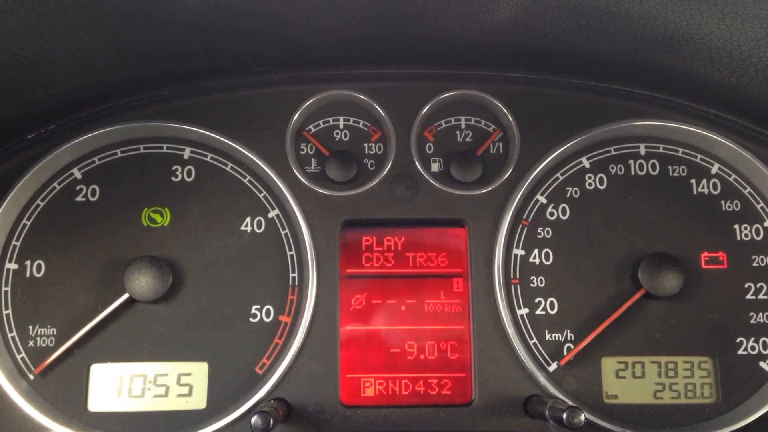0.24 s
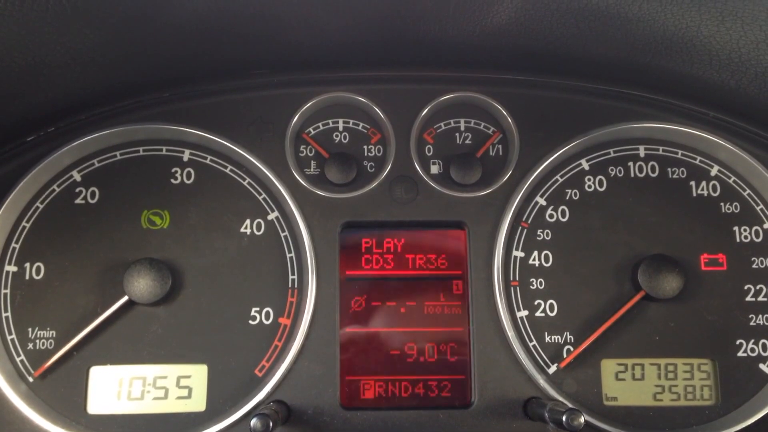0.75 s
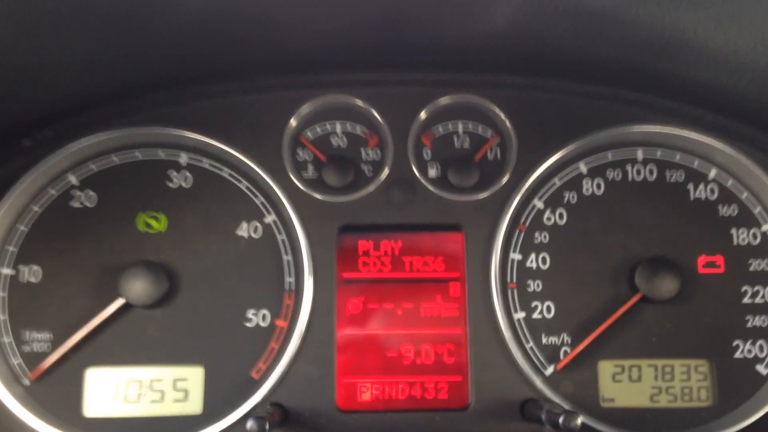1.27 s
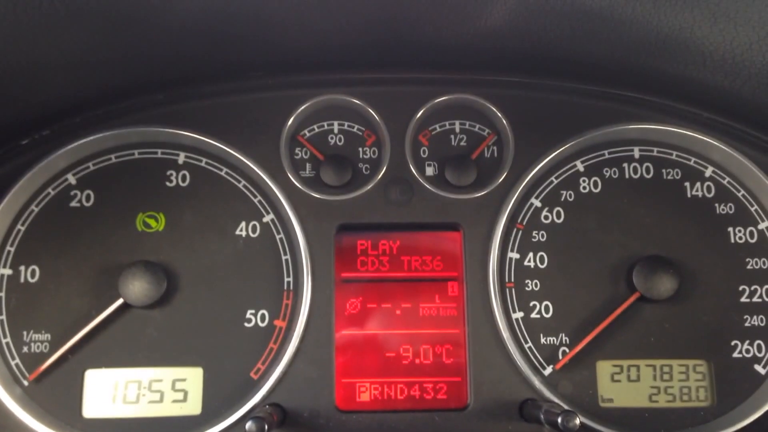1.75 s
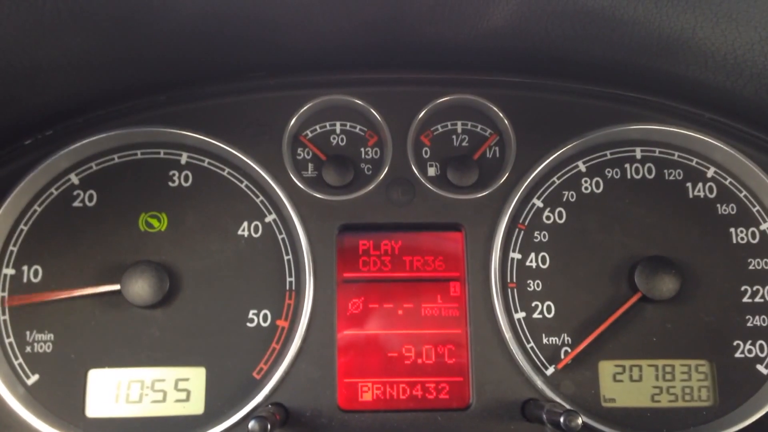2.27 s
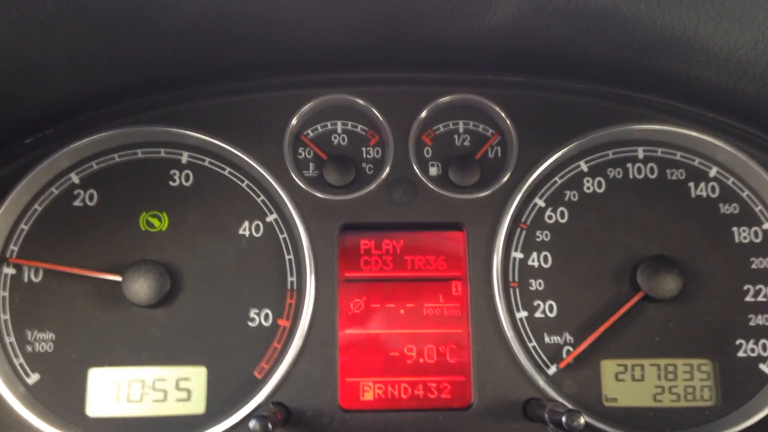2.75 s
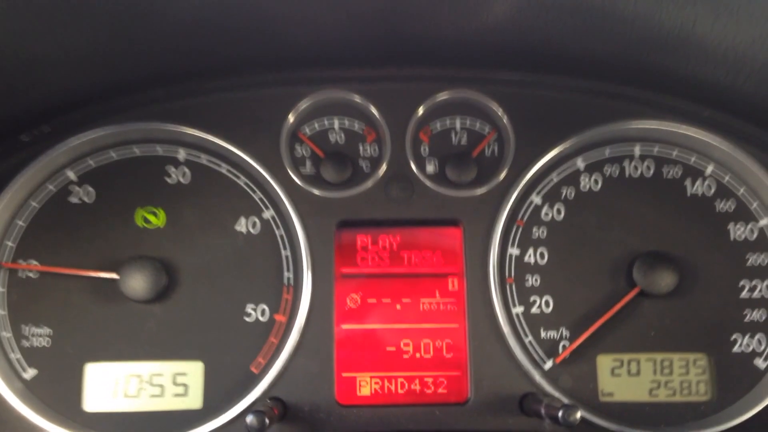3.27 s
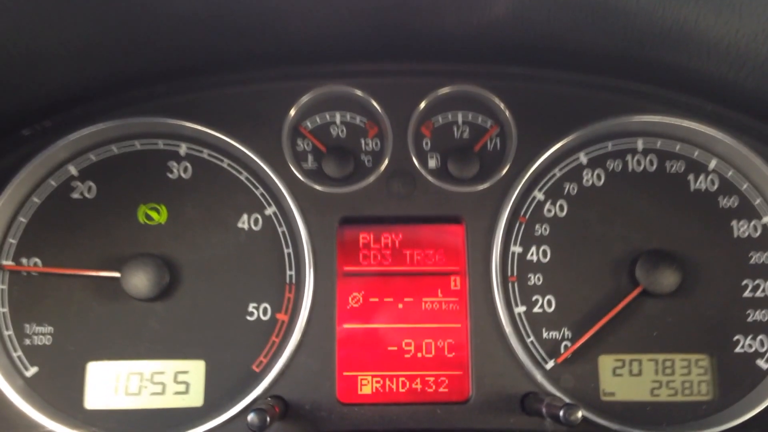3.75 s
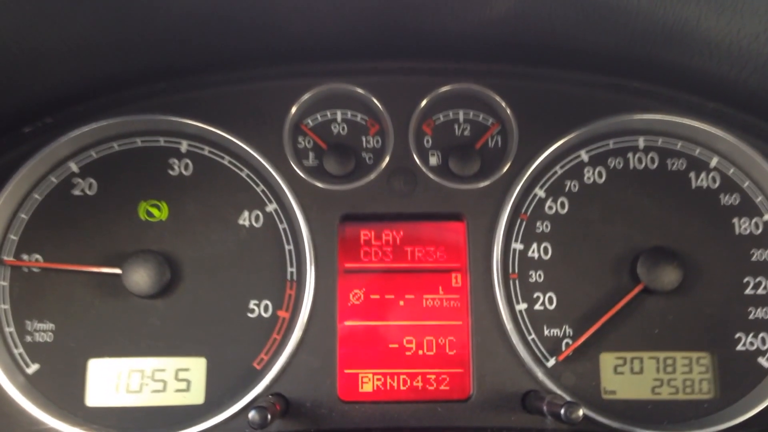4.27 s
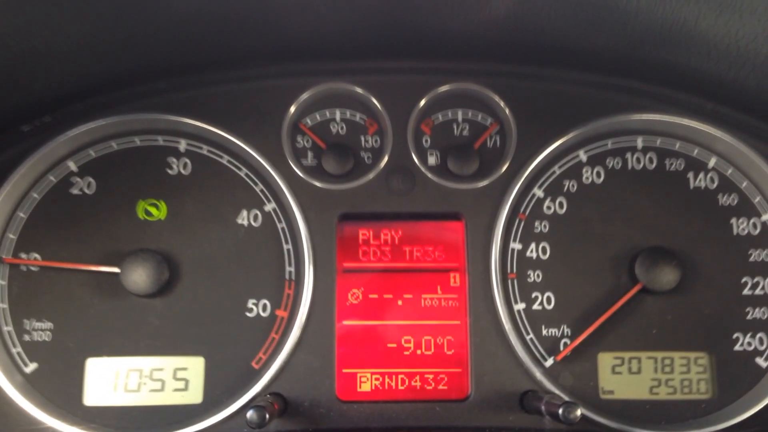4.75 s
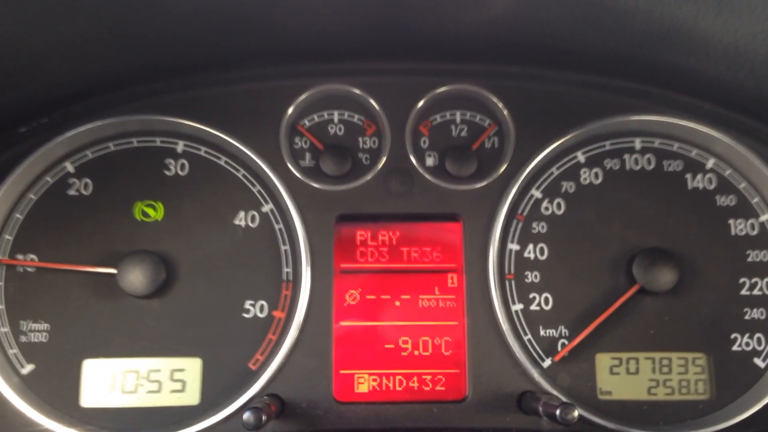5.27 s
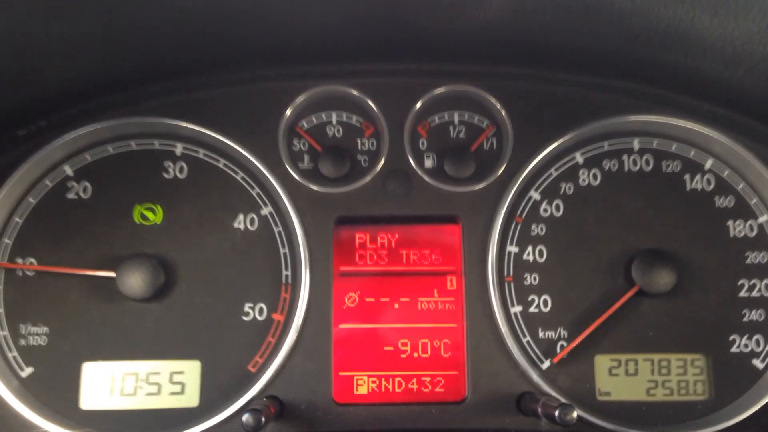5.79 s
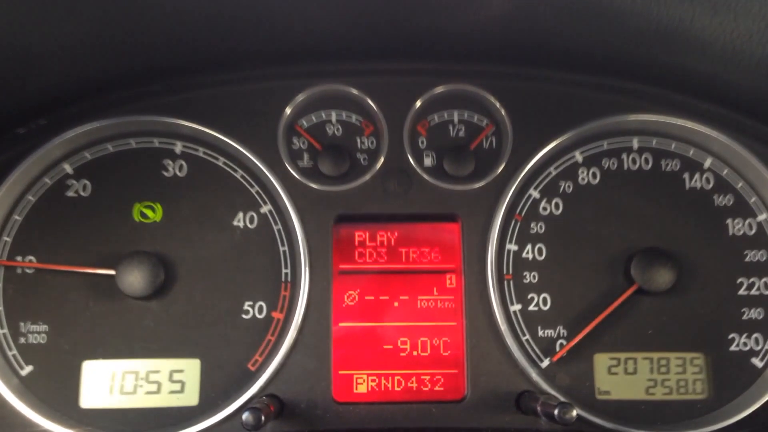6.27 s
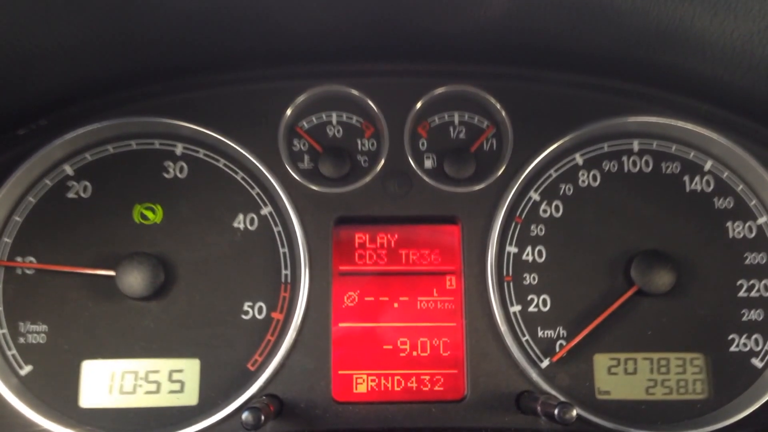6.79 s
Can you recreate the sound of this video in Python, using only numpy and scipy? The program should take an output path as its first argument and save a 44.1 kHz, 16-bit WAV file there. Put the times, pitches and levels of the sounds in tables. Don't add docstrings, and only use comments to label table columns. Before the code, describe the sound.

A small microphone in a closed cabin hears keys ring faintly, contacts tick and a starter grind for less than a second. The engine thumps into life with a sharp key-return clack, rises quickly with rattling trim, then slows to a low boomy diesel idle. Fan air swells softly and later fades; a single hollow snap and small ticks come near the end.

```python
import sys
import numpy as np
from scipy import signal
from scipy.fft import rfft, irfft, next_fast_len
from scipy.io import wavfile
from scipy.ndimage import map_coordinates

SR = 44100
rng = np.random.default_rng(int(sys.argv[2]) if len(sys.argv) > 2 else 0)


def inscribe(sig):
    pcm = np.round(np.clip(np.atleast_2d(sig).T, -1, 1) * 32767)
    wavfile.write(sys.argv[1], SR, pcm.astype(np.int16))


def makeup_ratio(level_db):
    decades = np.asarray(level_db, float) / 20
    return 10 ** decades


N = 310023
T = np.arange(N) / SR
CATCH_S = 1.3
TOP_HZ = 15350

# t/s, share/0-1
SHAKE = [(1.3, .8), (1.4, .4), (1.58, .13), (1.75, .08), (2.9, .08), (3.2, .18), (5.2, .2), (6.0, .18),
         (6.2, .05), (7.03, .04)]
# t/s, firing rate/Hz
SPEED = [(1.3, 25.5), (1.4, 28.55), (1.6, 38.45), (1.7, 41.87), (1.8, 42.87), (1.92, 43.1), (2.2, 41.9),
         (2.4, 40.16), (2.6, 38.19), (2.8, 36.8), (3.0, 34.66), (3.2, 33.17), (3.4, 32.54), (3.8, 33.3),
         (4.2, 33.8), (5.0, 33.98), (5.9, 33.95), (7.0, 34.25)]
# t/s, level/dB
LOAD = [(1.3, 2), (1.45, 3), (1.53, 6.5), (1.63, 4.5), (1.71, 4.5), (1.79, 0.5), (1.85, 3.5), (1.95, 1.5),
        (2.05, 2.5), (2.15, 2), (2.31, -1.5), (2.42, 2), (2.62, -2), (2.88, -0.5), (3.1, -2), (3.25, 0),
        (3.6, 0), (4.2, 2), (4.9, -0.5), (5.4, 0), (6.0, 0), (6.4, 0.5), (7.03, 0.5)]
BLOWER = (2.75, 3.6, 5.45, 6.6)


def unit(x):
    return x / np.sqrt(np.mean(x ** 2) + 1e-20)


def curves(rows):
    s, *cols = np.transpose(rows)
    return [np.interp(T, s, c) for c in cols]


def wobble(rate, count=N):
    coarse = T[:count:32]
    knots = rng.standard_normal(int(count * rate / SR) + 4)
    return np.interp(T[:count], coarse, map_coordinates(knots, [coarse * rate]))


def coloured(x, points):
    m = 2 * next_fast_len(len(x) // 2 + 8192)
    f, db = np.transpose(points)
    gain = makeup_ratio(np.interp(np.log(np.fft.rfftfreq(m, 1 / SR) + 1), np.log(f + 1), db))
    cep = irfft(np.log(gain + 1e-4), m)
    cep[1:m // 2] *= 2
    cep[m // 2 + 1:] = 0
    return irfft(rfft(x, m) * np.exp(rfft(cep)), m)[:len(x)]


def noise(points):
    return unit(coloured(rng.standard_normal(N), points))


def add(out, s, x):
    part = out[round(s * SR):][:len(x)]
    part += x[:len(part)]


def resonance(f, centre, width):
    return 1 / (1 + (2 * (f - centre) / width) ** 2)


def keys():
    # f/Hz, level/dB
    bunch = [(7445, -61), (7564, -53.5), (7617, -63), (7671, -61), (7698, -76), (7887, -66), (8016, -71),
             (8075, -61), (8118, -72), (8360, -64), (8581, -70), (8699, -61), (9022, -69), (9184, -66)]
    # start t/s, stop t/s, f/Hz, level/dB, t60/s
    single = [(0, .56, 6782, -57, 2), (0, .105, 5283, -59, 4), (.1, .29, 1760, -74, 5),
              (.29, .4, 7370, -54, .3), (.3, .39, 5283, -64, .5), (.66, .82, 7370, -66, 9),
              (.66, .815, 6780, -67, 9), (.27, .285, 8600, -62, .2), (0, .04, 9700, -64, 1),
              (.09, .27, 7370, -62, 2), (.02, .08, 8699, -57, 2), (.16, .19, 6000, -57, .2),
              (.1, .3, 4000, -75, 5)]
    last_stop_s, sooner_s_per_khz = 0.32, 0.15
    rings = []
    for hz, db in bunch:
        stop = last_stop_s - sooner_s_per_khz * (hz - bunch[0][0]) / 1000 + 0.022 * rng.standard_normal()
        rings.append((0, stop, hz, db + 7, 1.1))
    out, t = np.zeros(N), T[:SR]
    for start, stop, hz, db, t60 in rings + single:
        onset = np.clip((t - start + .01 * (start == 0)) / .01, 0, 1)
        damping = np.clip((stop - t) / .04 + .6, 0, 1) ** 2
        decay_db = db - 60 * np.abs(t - start) / t60
        flutter_db = 3.5 * wobble(45, SR) + 2 * wobble(130, SR)
        phase = 2 * np.pi * (hz * t + rng.random()) + .9 * wobble(60, SR)
        out[:SR] += onset * damping * makeup_ratio(decay_db + flutter_db) * np.sin(phase)
    return out


def lurches():
    # t/s, dashboard level/dB, floor pan level over dashboard/dB
    jolts = [(0.0, -60, 4.5), (.345, -58, -18), (0.47, -37, -18), (0.51, -34.5, -8), (.6, -52, -1),
             (.72, -51, -16), (.88, -37.5, -27), (.92, -39.5, -27), (1.13, -68, 0.5), (1.21, -53, -8),
             (1.27, -38, -13), (1.332, -34.5, -10), (1.43, -37, 6), (1.64, -44, -18), (2.641, -39, -6),
             (2.76, -42, -2), (2.98, -39, -2), (3.28, -49, 14), (3.46, -40.5, 15), (4.18, -45, 15),
             (4.81, -44, 14), (5.21, -56, 13), (5.77, -58, 8)]
    rise_s, t60_s = 0.02, 0.18
    dash, pan, t = np.zeros(N), np.zeros(N), T[:SR // 2]
    swell = np.clip(t / rise_s, 0, 1) * makeup_ratio(-60 * np.clip(t - rise_s, 0, 1) / t60_s)
    for s, db, pan_db in jolts:
        start = max(s - rise_s, 0)
        add(dash, start, makeup_ratio(db) * swell)
        add(pan, start, makeup_ratio(db + pan_db) * swell)
    return dash, pan


def body(turns):
    # f/Hz, level/dB per Hz
    pan_colour = [(12, -32), (25, -4), (50, -9.5), (66, 1), (95, 2), (115, -4), (150, -25), (300, -76.5)]
    dash_colour = [(60, -48), (100, -7.5), (120, -1), (160, 2.5), (200, -2), (240, -10.5), (300, -17),
                   (500, -65)]
    drone_colour = [(130, -29), (220, -1.5), (232, 2), (267, 1.5), (328, -4.5), (418, 1), (505, -10.5),
                    (571, -24), (750, -19.5), (980, -61), (1650, -120)]
    vent_colour = [(320, -20), (550, 3.5), (632, -0.5), (757, 0.5), (998, -3), (1480, -5), (1900, -9.5),
                   (2630, -16), (3220, -16), (3900, -23.5), (7000, -28), (9100, -50), (15400, -120)]
    load_db, (dash, pan) = curves(LOAD)[0], lurches()
    state_db = np.interp(T, [.42, .47, 1.0, CATCH_S], [-34.5, -18, -18, 0])
    air = np.interp(T, BLOWER, [0, 1, 1, 0])
    strength = makeup_ratio(2.5 * rng.standard_normal(400))[turns.astype(int)]
    throb = strength * np.exp(-3 * (turns % 1)) * (T > CATCH_S)

    share = np.sqrt(np.clip(curves(SHAKE)[0], 0, 1))
    pan_gain = makeup_ratio(-32.5 + 1.35 * state_db + 0.79 * load_db + 1.8 * wobble(11))
    dash_gain = makeup_ratio(-33 + 1.05 * state_db + 0.79 * load_db + 1.8 * wobble(11))
    shaking = share * ((pan_gain + pan) * noise(pan_colour) + (dash_gain + dash) * noise(dash_colour))

    drone_gain = makeup_ratio(-45 + 0.58 * state_db + load_db + 0.8 * wobble(6.4)) + makeup_ratio(-6.5) * dash
    drive = rng.standard_normal(N) * (np.interp(air, [0, 1], [.4, .9]) + throb) * makeup_ratio(0.81 * wobble(22))
    drone = drone_gain * unit(coloured(drive, drone_colour))

    blower = 1.35 + 1.2 * np.clip(2 * air, 0, 1)
    catching = makeup_ratio(-57.5 - 60 * np.abs(T - CATCH_S) / 1.8) * (T > 1.05)
    clatter_gain = makeup_ratio(-60.5 + 0.37 * state_db + 0.17 * load_db + 5.5 * air) + catching
    flutter = makeup_ratio(1.1 * wobble(14) + .4 * wobble(70) + .5 * wobble(300))
    clatter = clatter_gain * unit(noise(vent_colour) * (blower + throb) / (blower + .35) * flutter)
    return shaking + drone + clatter


def starter():
    # t/s, f/Hz, level/dB
    hum_track = [(0, 68.2, -59), (.3, 67.3, -66), (.45, 61.7, -56), (.55, 58.4, -37), (.65, 59.7, -52),
                 (1.0, 47.3, -64), (1.1, 45.6, -38.5), (1.22, 45.7, -41), (1.36, 46.4, -72)]
    # t/s, f/Hz, level/dB
    whine_track = [(0.55, 368.4, -59), (0.63, 388.6, -48.5), (0.696, 393, -66), (0.74, 377, -47.5),
                   (0.766, 385, -73), (0.884, 387, -54.5), (1.0, 378, -59)]
    # multiple of the whine, level/dB
    whine_parts = [(1, 0), (2.249, -23), (2.751, -25), (3.699, -36)]
    # t/s, level/dB
    grind_track = [(0.4, -51.5), (0.714, -69.5), (0.828, -55.5), (1.122, -75), (1.3, -59)]
    # f/Hz, level/dB per Hz
    gears = [(260, -8.5), (450, 1.5), (626, -10.5), (834, -7.5), (1080, -15), (1110, -28), (1380, -11),
             (2500, -58), (3250, -67), (5500, -120)]
    hz, db = curves(whine_track)
    on = np.clip((T - .52) / 0.028, 0, 1) * np.clip((1.03 - T) / 0.039, 0, 1)
    phase = 2 * np.pi * np.cumsum(hz) / SR
    orders = sum(makeup_ratio(part_db) * np.sin(times * phase) for times, part_db in whine_parts)
    whine = on * makeup_ratio(db + 4.0 + 3.37 * wobble(40.3)) * orders

    meshed = np.clip((T - .42) / 0.044, 0, 1) * np.clip((1.32 - T) / 0.02, 0, 1)
    grind = meshed * makeup_ratio(curves(grind_track)[0] + 2.8 * wobble(58.3)) * noise(gears)

    hz, db = curves(hum_track)
    hum_gain = makeup_ratio(db + 1.5 + 1.9 * wobble(4.4) + 4.9 * wobble(23.97))
    hum = hum_gain * np.sin(2 * np.pi * np.cumsum(hz + 3 * wobble(17.8)) / SR)
    return whine + grind + hum


def ticks():
    # t/s, peak level/dB, thud over snap/dB, fizz over snap/dB
    contacts = [(0.162, -52, -10, -10), (0.3332, -66, 22, 10), (0.418, -41.5, -14, 3.5),
                (0.4643, -60.5, 16, -4), (0.8538, -44, 1.5, 5), (1.1031, -48.5, 17.5, -2),
                (1.138, -41.5, 2, -16), (1.1625, -41, 0, -32), (1.28, -43, 7, -11), (1.2961, -24.5, -7, -8),
                (1.3132, -22, -14, -14), (1.309, -38, -6, -8), (1.3154, -20, -3, -3), (1.32, -32, -2, -10),
                (1.378, -50, 5, -21), (1.458, -41.5, -6, 0), (2.1715, -53.5, -12, 10.5),
                (4.421, -55, 14, -7), (4.4687, -48.5, 9, -9), (4.6466, -63, 3, -17), (5.004, -57, 10, -30),
                (5.161, -55, 5, -17), (5.4735, -44, 7, -3), (5.5194, -44, 11, 0.5), (5.6312, -46, 6, -12),
                (5.636, -45, 10, -18), (5.649, -46, 12, -14), (5.657, -51, 12, -20), (1.522, -65, 17, -16),
                (3.571, -62, 10, -21), (5.64, -24, 1, -18.5), (6.079, -35.5, 0.5, -7),
                (6.494, -63, 18.5, -4.5)]
    # t/s, peak level/dB, f/Hz, t60/s
    knocks = [(0.18, -55.5, 3300, 0.089), (.281, -52, 3410, 0.058), (0.288, -52, 3240, 0.082),
              (0.34, -44, 465, 0.12), (.336, -32, 1347, 0.026), (0.33, -35, 1740, 0.057),
              (.461, -48, 630, 0.051), (1.12, -32, 530, 0.026), (1.102, -34.5, 1000, 0.019),
              (1.163, -33, 2680, 0.026), (1.297, -20, 4100, 0.019), (1.297, -22, 4300, 0.015),
              (1.297, -20.5, 8790, 0.023), (1.297, -29, 9440, 0.018), (1.3, -23, 1920, 0.018),
              (1.38, -35, 1380, 0.019), (2.172, -48.5, 3600, 0.067), (2.2, -48.5, 4500, 0.038),
              (4.319, -51, 5320, 0.037), (.337, -39, 1530, 0.042), (.338, -43, 1150, 0.046),
              (.42, -46, 10200, .03), (.419, -49, 6350, .03), (.419, -50, 6100, .03),
              (.277, -52, 6780, .05), (.16, -51, 5500, .05), (4.6, -46, 1700, .03), (4.47, -51, 2900, .03),
              (4.647, -54, 3300, .03), (5.005, -56, 2530, .03), (5.005, -55, 3000, .03),
              (1.579, -42, 700, .03), (1.1, -38, 900, 0.024), (4.312, -50, 1295, 0.055),
              (5.631, -47, 4200, 0.053), (5.641, -21, 660, 0.024), (5.641, -28, 810, 0.036),
              (5.652, -36, 1100, .05), (2.173, -47, 3700, 0.037), (1.104, -38, 680, 0.018),
              (1.14, -38, 2400, 0.031), (1.458, -40, 1250, .04), (1.461, -48, 1840, .04),
              (1.141, -36, 1940, 0.039), (1.14, -36, 1200, .03), (1.165, -37, 1400, 0.027),
              (1.522, -45, 925, 0.047), (3.572, -42, 680, 0.03), (6.079, -33.5, 1700, 0.043),
              (6.079, -42, 3200, 0.037)]
    # t/s, peak level/dB, f/Hz, t60/s
    thumps = [
        (1.035, -23.5, 152, .16),
        (1.037, -30.5, 343, 0.049),
        (1.274, -18, 416, .033),
        (1.3295, -26, 270, 0.028),
        (1.41, -26.5, 92.5, 0.46),
        (1.5, -29, 103, 0.27),
    ]
    out, t = np.zeros(N), T[:SR // 8]
    rise = 1 - np.exp(-t / .0015)
    first_contact = np.arange(len(t)) == round(.0012 * SR)
    for s, db, low_db, high_db in contacts:
        t60 = np.clip(.042 - .0008 * (db + 40.5), .02, .06)
        snap = 7.5 * np.clip((db + 48) / 20, 0, 1)
        colour = [(350, low_db - 24), (900, low_db), (1800, low_db - 4.0), (3000, -3.5), (5000, -3),
                  (8500, high_db - 7.0), (14000, high_db - 16.0), (TOP_HZ, high_db - 19),
                  (TOP_HZ + 200, high_db - 66), (TOP_HZ + 900, -100)]
        cabin_tail = makeup_ratio(-22 - 60 * t / 0.09)
        shape = rise * (makeup_ratio(-60 * t / t60) + makeup_ratio(6 - 60 * t / 0.008) + cabin_tail)
        crackle = shape * rng.standard_normal(len(t)) - snap * first_contact
        add(out, s, makeup_ratio(db + 5) * coloured(crackle, colour))
    for s, db, hz, t60 in knocks + thumps:
        drift = np.cumsum(rng.standard_normal(len(t))) * .00004 * hz
        rough_db = 5 * min(hz / 1500, 1) * wobble(400, len(t))
        add(out, s, makeup_ratio(db - 60 * t / t60 + rough_db) * rise * np.sin(2 * np.pi * hz * t + drift))
    return out


def crank():
    turns = np.cumsum(curves(SPEED)[0]) / SR + 0.42
    blows = np.diff(np.floor(turns), prepend=0) * (T > CATCH_S)
    return turns, blows


def firing(turns):
    # f/Hz, level/dB
    cabin = [(25, -65), (34, -44), (43, -37.5), (55, -27), (68, -41), (77, -41), (86, -61), (100, -44),
             (120, -46.5), (136, -43), (152, -40.5), (190, -54.5), (208, -47), (240, -72), (430, -62)]
    # f/Hz, width/Hz, level/dB
    boom = (160.9, 17.6, -39.5)
    # f/Hz, width/Hz, level/dB
    door = (425, 100, -60.5)
    rate, burn_db = curves(SPEED)[0], curves(LOAD)[0]
    hz, db = np.transpose(cabin)
    loose = .12 + 1.3 * curves(SHAKE)[0]
    uneven_db = 2 * wobble(22)
    out = np.zeros(N)
    for k in range(1, 14):
        f = k * rate
        size = makeup_ratio(np.interp(f, hz, db)) * (k < 10)
        size = size + resonance(f, *boom[:2]) * makeup_ratio(boom[2] + 1.66 * burn_db)
        size = size + resonance(f, *door[:2]) * makeup_ratio(door[2])
        sway_db = 3 * np.sqrt(loose) * min(k / 3, 1) * wobble(9)
        phase = 2 * np.pi * k * turns + loose * wobble(1.5) + 2.8
        out += size * makeup_ratio(sway_db + (k > 2) * uneven_db) * np.sin(phase)
    return np.sqrt(2) * out * makeup_ratio(burn_db) * np.clip((T - CATCH_S) / 0.35, 0, 1)


def clacks():
    # f/Hz, level/dB, t60/s
    barrel = [(1390, -3.5, 0.048), (2000, -6, 0.035), (2390, -6.5, 0.027), (3080, -1.5, 0.023),
              (3670, -0.5, 0.025), (4930, -9, 0.024), (6050, -25, .04), (6350, -18, .019), (7500, -19, .03),
              (8500, -11, 0.031), (8950, -17, .035), (9948, -11, 0.023)]
    # t/s, level/dB
    barrel_hits = [
        (1.303, -39),
        (1.307, -39),
        (1.3134, -27),
        (1.3158, -24),
        (1.3198, -30.5),
        (1.325, -38.5),
    ]
    # f/Hz, level/dB, t60/s
    clack = [(977, -4, 0.11), (1214, -1, 0.086), (1480, -1, 0.13), (1644, 0.5, 0.04), (2090, -19, 0.05),
             (2380, -5, 0.071), (3320, -22, 0.043), (4500, -27, 0.058), (5265, -19, 0.027),
             (6089, -28, 0.035), (6412, -30, 0.041), (7246, -26, 0.041)]
    # t/s, level/dB
    clack_hits = [
        (5.6397, -31),
        (5.6452, -44),
        (5.6495, -40),
        (5.654, -47),
        (5.660, -46),
    ]
    out, t = np.zeros(N), T[:SR // 8]
    for modes, hits in ((clack, clack_hits), (barrel, barrel_hits)):
        for s, db in hits:
            ring = np.zeros(len(t))
            for hz, level, t60 in modes:
                decay_db = level + rng.normal(0, 1.8) - 60 * t / min(t60, .04)
                rough_db = 5 * wobble(490, len(t))
                phase = 2 * np.pi * (hz * rng.normal(1, 0.0276) * t + rng.random())
                ring += makeup_ratio(decay_db + rough_db) * np.sin(phase)
            add(out, s, makeup_ratio(db) * (1 - np.exp(-t / 0.00071)) * ring)
    return out


def ducts():
    # f/Hz, width/Hz, level/dB
    pipes = [(750, 130, -67), (1230, 130, -75), (1480, 130, -70), (1800, 140, -75), (2450, 140, -76)]
    hz, air = np.fft.rfftfreq(N, 1 / SR), np.interp(T, BLOWER, [0, 1, 1, 0])
    out = np.zeros(N)
    for centre, width, db in pipes:
        flutter = makeup_ratio(db + 2.5 * wobble(6.5))
        out += flutter * unit(irfft(rfft(rng.standard_normal(N)) * resonance(hz, centre, width), N))
    return (T > CATCH_S) * makeup_ratio(-16 * (1 - air)) * out


def cold_cylinder(turns):
    # t/s, level/dB
    knock = [(1.45, -72), (1.52, -52), (1.65, -53), (1.9, -53), (2.3, -64), (2.7, -61), (3.1, -68)]
    # f/Hz, level/dB per Hz
    colour = [(300, -31), (520, 2.5), (900, -5), (1250, -9), (1700, -20), (3000, -48)]
    cycle = (turns - np.interp(2, T, turns)) / 4 % 1
    burst = np.clip(cycle / 0.069, 0, 1) * np.exp(-4.1 * cycle) * (T > 1.45) * (T < 3.1)
    return 2 * makeup_ratio(curves(knock)[0]) * burst * noise(colour)


def panel(blows):
    # t/s, peak level/dB, fizz over ring/dB
    buzz = [(1.5178, -61, -16), (1.5338, -61, -15), (1.5532, -59, -19), (1.5796, -57, -11),
            (1.606, -45, -12), (1.6317, -43.5, -12), (1.6565, -49, -7), (1.682, -50, -6), (1.7072, -47, -5),
            (1.7313, -48, -6), (1.7565, -43, -8), (1.7807, -52, -5), (1.805, -51, -14), (1.829, -57, -14),
            (1.8684, -61, -14), (1.8954, -55, -15), (1.918, -60, -14), (1.9413, -56, -14),
            (1.9647, -61, -14), (1.984, -63, -14), (2.0111, -59, -15), (2.082, -60, -14), (2.128, -61, -14),
            (2.274, -60, -14), (2.3707, -62, -14), (2.5199, -62, -14), (2.6222, -62, -14),
            (2.6491, -60, -14), (2.0356, -54, -19), (2.0591, -57, -11), (2.104, -60, -13),
            (2.1543, -51, -13), (2.178, -51, -14), (2.2027, -52, -22), (2.2267, -59, -13),
            (2.2511, -55, -15), (2.298, -63, -12), (2.321, -61, -10), (2.3434, -59, -15), (2.395, -61, -13),
            (2.4192, -55, -12), (2.4437, -56, -14), (2.4661, -59, -12), (2.4941, -61, -10),
            (2.5375, -59, -12), (2.5724, -58, -14), (2.5998, -58, -15)]
    # f/Hz, width/Hz, level/dB
    modes = [(1890, 79, -1), (4500, 570, 15), (3900, 500, 8), (5300, 800, 5), (2440, 150, -8),
             (1320, 200, -1)]
    # f/Hz, width/Hz, level/dB
    fastener = (2670, 130, -70)
    # t/s, peak level/dB
    chatter = [(1.8891, -62), (1.9071, -59), (1.9959, -66), (2.2283, -62), (2.5765, -66), (2.5945, -66),
               (2.6224, -62), (2.6993, -60), (2.7267, -61), (2.824, -66)]
    t, n, out = T[:SR // 30], round(3.2 * SR), np.zeros(N)
    rise = 1 - np.exp(-t / 0.0034)
    for s, db, fizz_db in buzz:
        tap = (t == 0) + 0.05 * np.exp(-t / 0.0036) * rng.standard_normal(len(t))
        ring = np.zeros(len(t))
        for hz, width, level in modes:
            gain = makeup_ratio(level + rng.normal(0, 1) + fizz_db * (hz > 3000))
            ring += gain * np.exp(-np.pi * width * t) * np.sin(2 * np.pi * hz * t)
        add(out, s - .002, makeup_ratio(db + 8.5) * signal.fftconvolve(tap, ring * rise))

    hz, width, level = fastener
    tone = np.sin(2 * np.pi * hz * t)
    for s, db in chatter:
        gain = makeup_ratio(db + 5 - 60 * t / 0.041 + 3.6 * wobble(300, len(t)))
        add(out, s - .002, gain * (1 - np.exp(-t / .003)) * tone)
    rattle = .25 * signal.fftconvolve(blows[:n], np.exp(-t / .004))[:n] * rng.standard_normal(n)
    slowing = (T[:n] > 1.85) * (T[:n] < 2.8)
    late = makeup_ratio(level + 5 * wobble(9, n)) * slowing * (blows[:n] + rattle)
    out[:n] += signal.fftconvolve(late, np.exp(-np.pi * width * t) * rise * tone)[:n]
    return out


def tappet(turns):
    # t/s, peak level/dB
    valve = [(2.9, -60), (3.6, -43), (5.3, -41), (6.1, -36), (7.03, -37)]
    cycles = (turns - np.interp(6.174, T, turns)) / 4
    out, t = np.zeros(N), T[:SR // 16]
    for s in T[1:][(np.diff(np.floor(cycles)) > 0) & (T[1:] > valve[0][0])]:
        db = np.interp(s, *np.transpose(valve)) + 2.5 * rng.standard_normal()
        tone = np.sin(2 * np.pi * 410 * rng.normal(1, 0.045) * t)
        add(out, s, makeup_ratio(db - 60 * t / .1) * (1 - np.exp(-t / 0.0035)) * tone)
    return out


def scene():
    turns, blows = crank()
    metal = keys() + ticks() + clacks()
    engine = body(turns) + starter() + firing(turns) + cold_cylinder(turns) + tappet(turns)
    return (metal + engine + ducts() + panel(blows))[None]


def low_pass(x):
    return signal.sosfilt(signal.butter(12, 16240, fs=SR, output="sos"), x)


def record(dry):
    # f/Hz, level/dB per Hz
    hiss_colour = [(1180, -32), (2000, -6.5), (2630, -7), (3020, -9.5), (3290, -6), (7360, -9.5),
                   (14100, -11), (15500, -12)]
    hz = np.fft.rfftfreq(N, 1 / SR)
    hiss = irfft(rfft(noise(hiss_colour)) * (hz < TOP_HZ), N)
    band = np.interp(hz, [TOP_HZ, TOP_HZ + 100, 16200, 16250], [1, .3, .3, 0])
    dry = irfft(rfft(dry) * band, N)
    return low_pass(dry + makeup_ratio(-66.5) * unit(hiss))


dry = scene()
out = record(dry)
inscribe(out)
```